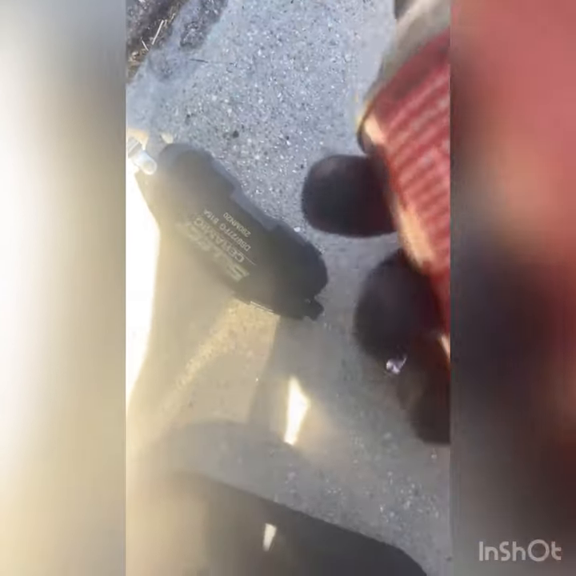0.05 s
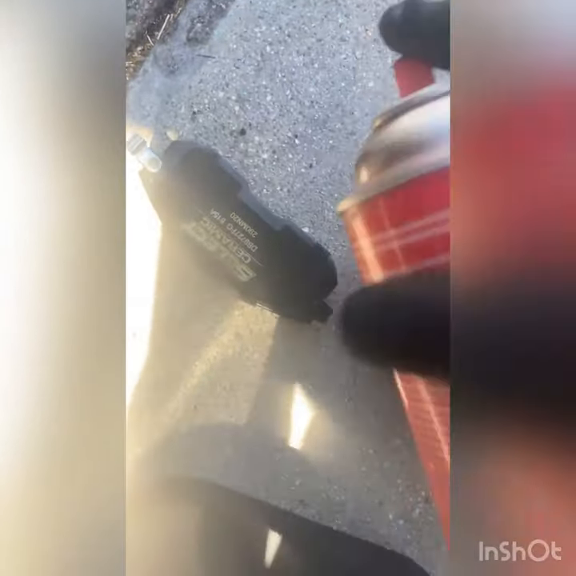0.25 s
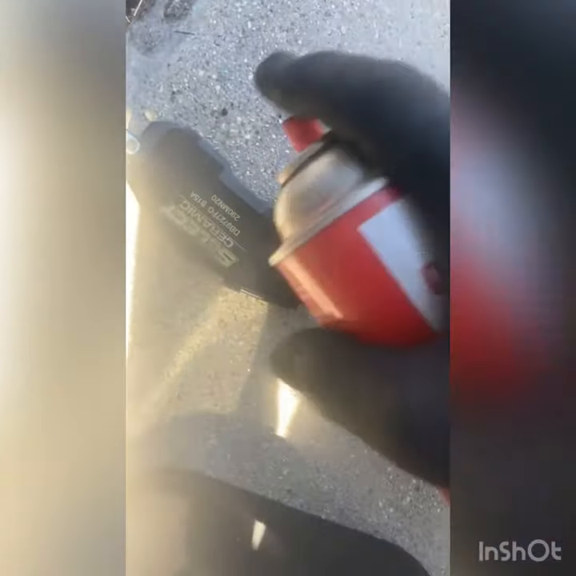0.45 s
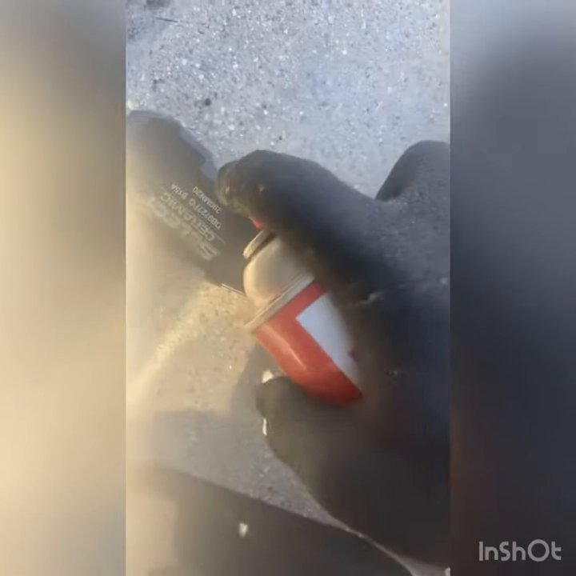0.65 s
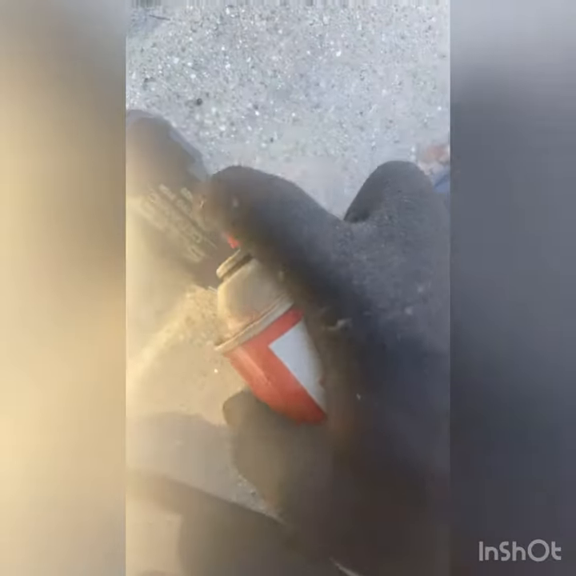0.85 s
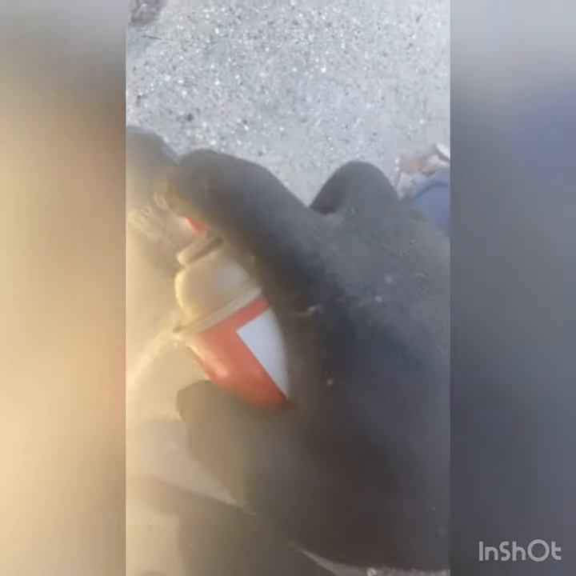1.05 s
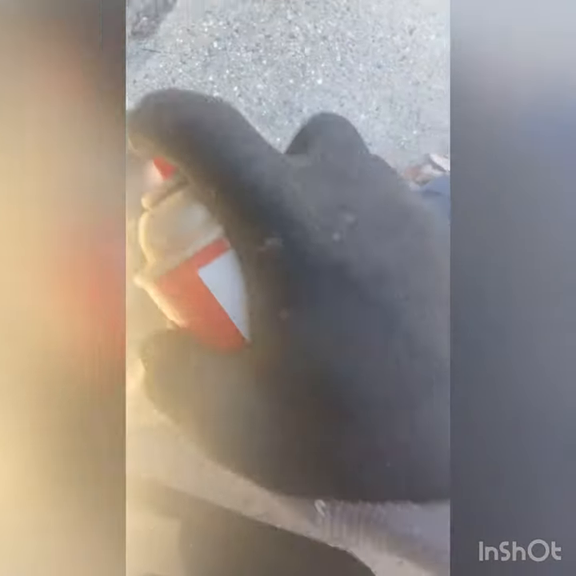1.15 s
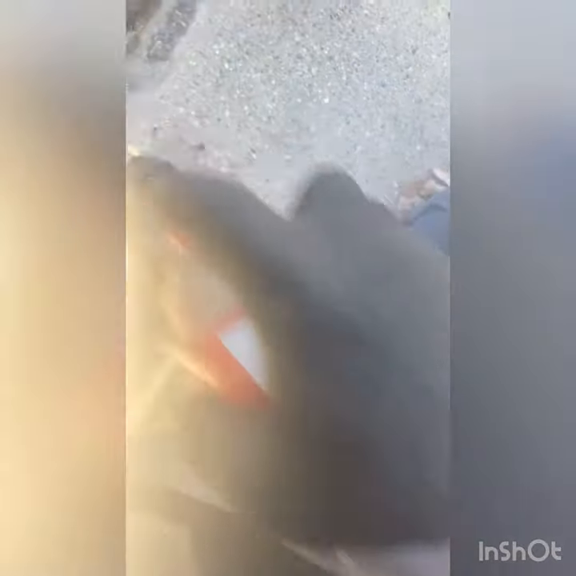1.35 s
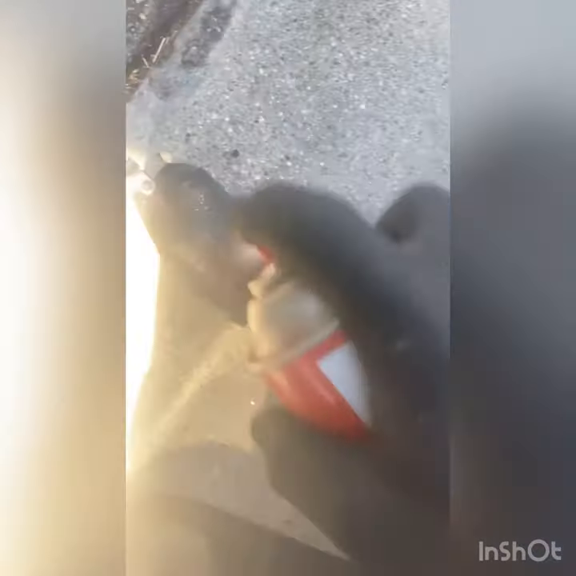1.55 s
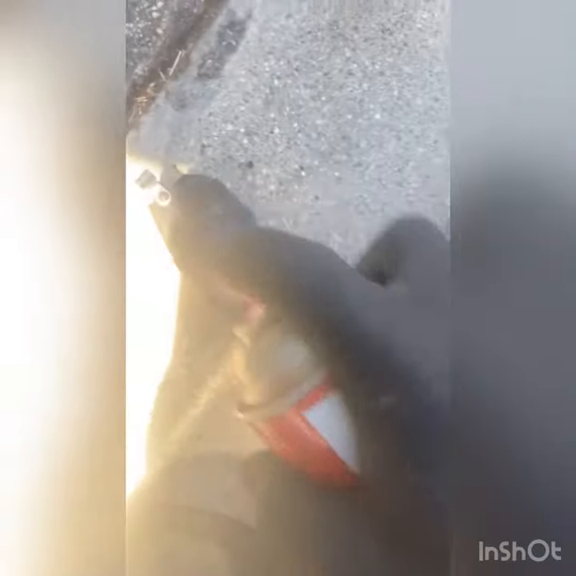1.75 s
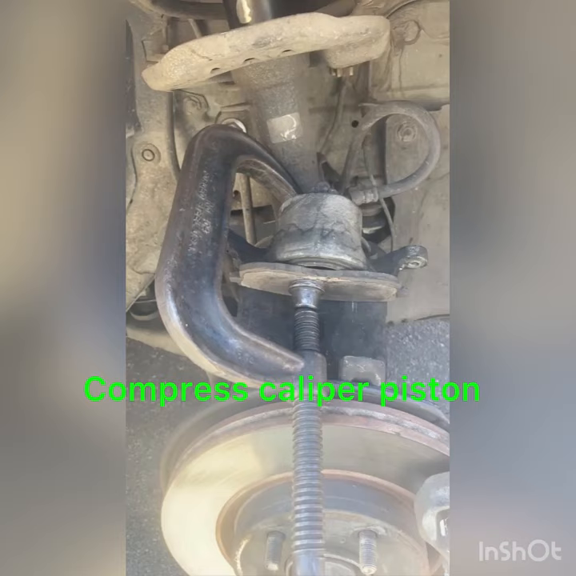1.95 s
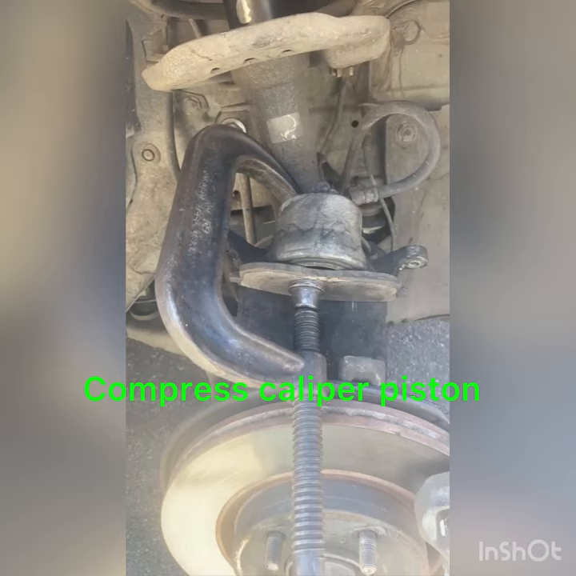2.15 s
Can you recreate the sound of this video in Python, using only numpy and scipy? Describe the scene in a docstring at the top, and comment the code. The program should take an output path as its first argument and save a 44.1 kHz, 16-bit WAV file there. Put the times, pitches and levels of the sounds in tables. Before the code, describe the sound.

A spray can rattles briefly, then sprays with a steady hiss outdoors.

```python
"""A spray can in a gloved hand, close up, outdoors beside a car wheel, over steady air and low rumble. The can
rings faintly and the glove ticks the plastic nozzle; as it is turned, the mixing ball knocks on the steel wall.
Soft handling bumps follow. At 0.8 s the valve opens to a steady hiss whose colour shifts as the can is waved
about. The ball knocks again near 1.5 and 1.9 s; at 1.96 s the sound breaks off abruptly."""
import sys
import numpy as np
from scipy import signal
from scipy.fft import rfft, irfft
from scipy.io import wavfile
from scipy.ndimage import map_coordinates

SR = 44100
rng = np.random.default_rng(int(sys.argv[2]) if len(sys.argv) > 2 else 0)


def transcribe(u):
    """Save the signal u as a 16-bit wav file named by the first command-line argument.

    u: samples, shape (n,) or (channels, n), limited to [-1, 1]; the rate is SR.
    q: integer samples, one column per channel.
    """
    v = np.clip(np.atleast_2d(u).T, -1, 1)
    q = np.round(v * 32767).astype(np.int16)
    wavfile.write(sys.argv[1], SR, q)


N = 97020
T = np.arange(N) / SR

# outdoor background spectra: (frequency [Hz], relative density [dB])
AIR_SPECTRUM = [(90, -11.5), (170, -2.5), (260, -10), (340, -8), (520, -18), (660, -17), (860, -12.5),
                (1200, -20.5), (1500, -19), (2200, -27), (3300, -34.5), (5400, -38.5), (15000, -61)]
RUMBLE_SPECTRUM = [(22, -28), (40, -8), (62, 4.5), (85, 0), (118, 2.5), (150, -4.5), (220, -26), (400, -52)]
# handling bumps: (time [s], level [dB], frequency [Hz])
BUMPS = [(0.614, -27.5, 89), (0.733, -24.5, 65.7), (0.802, -31.5, 61), (0.846, -34, 80.5),
         (0.905, -30.5, 72), (1.000, -26.5, 62), (1.077, -33, 56.7), (1.172, -32.5, 67), (1.845, -33, 110)]
# glove on nozzle: (time [s], level [dB], ping frequency [Hz])
TICKS = [(.0120, -30, 2100), (0.1098, -36, 2300), (0.1123, -44, 6700), (0.129, -46.5, 2400),
         (0.4718, -34, 4070)]
# ball on wall: (time [s], strength [dB], brightness [dB], frequency the struck spot favours [Hz])
KNOCKS = [(0.181, -39, 7, 3000), (0.199, -29, -0.5, 3700), (0.2472, -0.5, -2, 2450),
          (.2712, -6, -0.5, 1760), (0.2858, -19.5, -4, 1600), (.3320, -19.5, -1.5, 2410),
          (0.3446, -32, 3, 2700), (.3550, -36.5, -1.5, 2220), (.4312, -37, 4, 1700),
          (0.4477, -38.5, 1, 4200), (0.575, -37, 0, 1700), (0.613, -40.5, 3, 2250),
          (1.5118, -17, 9.5, 4560), (1.5403, -22, -3, 1800), (1.5557, -25, 5, 1770),
          (1.5640, -29, -7, 2000), (1.8612, -14.5, 5, 4300), (1.894, -25, -7.5, 2110)]
# modes of the liquid-damped can: (frequency [Hz], relative level [dB], T60 [s])
CAN_MODES = [(1294, -16, 0.06), (1619, -6, 0.048), (1690, -14.5, 0.077), (2024, -1, 0.045),
             (2200, -8, 0.049), (2569, -1, .029), (2700, -6.5, .032), (3005, -12.5, 0.042),
             (3127, -22, .03), (3570, -9.5, 0.014), (3773, -8, 0.034), (4170, -22, .03),
             (4360, -16.5, 0.039), (4820, -17, 0.04), (6000, -15, 0.027)]
# spectra of nozzle snap, ball contact, dense wall modes, jet: (frequency [Hz], relative density [dB])
TICK_SPECTRUM = [(500, -4.5), (1800, 6), (4000, 0.5), (6500, -3), (8500, -13), (11000, -5.5), (15500, -17)]
CRACK_SPECTRUM = [(1000, -11), (2600, 9), (4000, 4.5), (5300, -8.5), (7000, -5), (8500, -18.5), (11000, -7),
                  (15500, -23)]
CLANK_SPECTRUM = [(400, -24.5), (1000, -5.5), (2400, -7.5), (3900, 0), (5300, -12), (6700, -8), (8000, -23),
                  (11000, -12.5), (15500, -29)]
JET_SPECTRUM = [(350, -48), (600, -45), (678, -8), (855, -15), (1110, -20.5), (1200, -13.5), (1460, -12),
                (1560, -5.5), (2350, -6.5), (2690, -4), (3390, -6.5), (3680, -5.5), (4770, -1),
                (5320, -2.5), (7480, -5.5), (8220, -12), (9050, -0.5), (10200, -4.5), (12600, 4.5),
                (13300, 4), (15600, -10.5)]
# edges of the four hiss bands: (frequency [Hz])
HISS_EDGES_HZ = [600, 3500, 8200, 10300, 16000]
# band levels as the can moves: (time [s], low [dB], middle [dB], upper [dB], top [dB])
HISS_LEVELS = [(.82, -42, -38, -43.5, -40), (.87, -42, -40, -44, -38), (.93, -41.5, -33.5, -47, -34),
               (1.02, -44, -36.5, -41, -37.5), (1.10, -46, -38, -36, -37.5), (1.16, -47, -38.5, -37, -35),
               (1.23, -47.5, -38.5, -39.5, -40), (1.33, -44.5, -36.5, -41, -36),
               (1.47, -41, -35, -38, -34.5), (1.58, -43.5, -37, -45, -34), (1.66, -44, -36, -45.5, -34.5),
               (1.83, -42, -36, -42, -33), (1.90, -39, -35, -40.5, -37), (1.95, -46, -39, -42, -38.5)]
# narrow notches in the hiss: (width [Hz], rows of (time [s], centre [Hz], gain [dB]))
NOTCHES = [(115, [(1.10, 4870, 0), (1.17, 4900, -13), (1.30, 4990, -13), (1.37, 5100, -12),
           (1.43, 5180, -38), (1.52, 5200, 0)]), (120, [(1.50, 6980, 0), (1.57, 6830, -22),
           (1.65, 6800, 0)]), (90, [(1.66, 4500, 0), (1.73, 4420, -24), (1.80, 4380, 0)]),
           (190, [(.84, 8050, -2), (.98, 8550, -20), (1.10, 8250, 3), (1.24, 8080, -15), (1.37, 8300, -4),
           (1.48, 8080, -28), (1.58, 8200, 0), (1.66, 8400, -32), (1.73, 8100, -28), (1.92, 8080, -27)]),
           (250, [(1.08, 10200, 4), (1.17, 10100, -12), (1.27, 9950, -36), (1.35, 9950, -6),
           (1.44, 10000, 0), (1.50, 10050, -14), (1.60, 9500, -14), (1.72, 10000, 6), (1.88, 10400, -7)])]


def from_db(db):
    """Decibels to gain."""
    return 10 ** (np.asarray(db) / 20)


def unit_rms(x):
    """Scale to unit rms."""
    return x / np.sqrt(np.mean(x ** 2) + 1e-20)


def noise(spectrum, low_hz=15, high_hz=20000):
    """Coloured, band-limited noise, unit rms."""
    hz = np.arange(N // 2 + 1) * SR / N + 1e-3
    points_hz, points_db = np.transpose(spectrum)
    gain = from_db(np.interp(np.log(hz), np.log(points_hz), points_db))
    in_band = (hz > low_hz) & (hz < high_hz)
    return unit_rms(irfft(rfft(rng.standard_normal(N)) * gain * in_band, N))


def drift(rate_hz):
    """Smooth random wander, unit rms."""
    hz = np.arange(N // 2 + 1) * SR / N
    gain = (hz > 0) / (1 + (hz / rate_hz) ** 2)
    return unit_rms(irfft(rfft(rng.standard_normal(N)) * gain, N))


def impulses(times_s, levels_db):
    """One impulse per event."""
    out = np.zeros(N)
    np.add.at(out, (np.abs(times_s) * SR).astype(int), from_db(levels_db))
    return out + 1e-18


def ring(x, hz, t60_s):
    """One mode: each impulse starts a decaying sine."""
    radius, angle = from_db(-60 / (t60_s * SR)), 2 * np.pi * hz / SR
    return signal.lfilter([0, np.sin(angle)], [1, -2 * radius * np.cos(angle), radius ** 2], x)


def decay(x, t60_s):
    """Each impulse starts a decaying envelope."""
    return signal.lfilter([1], [1, -from_db(-60 / (t60_s * SR))], x)


def outdoors(air_db=-45, waver_db=1, rumble_db=-41.5):
    """Slightly wavering air over a low rumble."""
    air = from_db(air_db + waver_db * drift(rate_hz=24)) * noise(AIR_SPECTRUM)
    return air + from_db(rumble_db) * noise(RUMBLE_SPECTRUM)


def handling(rise_s=.02):
    """Each bump swells and dies within a few low cycles."""
    out = np.zeros(N)
    for start_s, db, hz in BUMPS:
        age_s = np.maximum(T - start_s, 0)
        envelope = (age_s / rise_s * np.exp(1 - age_s / rise_s)) ** 2
        out += from_db(db) * envelope * np.sin(2 * np.pi * hz * age_s)
    return out


def nozzle_ticks(ping_gain_db=-2):
    """The glove catches the plastic nozzle: bright snaps, each with its own ping."""
    times_s, levels_db, _ = np.transpose(TICKS)
    pings = sum(ring(impulses(at_s, db + ping_gain_db), hz, t60_s=.042) for at_s, db, hz in TICKS)
    return noise(TICK_SPECTRUM) * decay(impulses(times_s, levels_db), t60_s=.03) + pings


def can_ring(gain_db=-9, spot_db=5, spot_octaves=.22, bright_above_hz=3200, wall_trip_s=.0008):
    """Knocks start each mode within one trip round the wall; the struck spot favours some."""
    times_s, strength_db, bright_db, spot_hz = np.transpose(KNOCKS)
    starts_s = times_s[:, None] + wall_trip_s * rng.random((len(KNOCKS), len(CAN_MODES)))
    out = np.zeros(N)
    for k, (hz, mode_db, t60_s) in enumerate(CAN_MODES):
        favour_db = spot_db * np.exp(-(np.log2(hz / spot_hz) / spot_octaves) ** 2)
        levels_db = gain_db + strength_db + mode_db + favour_db + bright_db * (hz > bright_above_hz)
        out += ring(impulses(starts_s[:, k], levels_db), hz, t60_s)
    return out


def mixing_ball(crack_db=-15.5, clank_db=-23.5, tail_db=-36.5, rim_db=-37, rim_hz=2060, rim_t60_s=.17):
    """Ball on steel: contact crack, brief clank, modal ring. The small can radiates no bass."""
    times_s, strength_db, bright_db, _ = np.transpose(KNOCKS)
    blows = impulses(times_s, strength_db + bright_db)
    crack = noise(CRACK_SPECTRUM) * from_db(crack_db) * decay(blows, t60_s=.0071)
    tail = from_db(tail_db) * decay(blows, t60_s=.091)
    clank = noise(CLANK_SPECTRUM) * (from_db(clank_db) * decay(blows, t60_s=.039) + tail)
    rim = from_db(rim_db - 60 * T / rim_t60_s) * np.sin(2 * np.pi * rim_hz * T)   # ringing from 0 s
    radiation = signal.butter(2, 800, "high", fs=SR, output="sos")
    return signal.sosfilt(radiation, crack + clank + rim + can_ring())


def near_echoes(x, count=7, near_s=.0007, far_s=.0045, gain=.23, sway_s=.00005):
    """Echoes off hand and wheel, their paths swaying, give a hollow, shifting colour."""
    lags_s = np.geomspace(near_s, far_s, count) * rng.uniform(.9, 1.1, count)
    echoes = np.zeros(N)
    for lag_s in lags_s:
        emitted_s = T - lag_s - sway_s * drift(rate_hz=.8)
        echoes += map_coordinates(x, [emitted_s * SR], order=3)
    return (x + gain * echoes) / np.sqrt(1 + count * gain ** 2)


def sliding_notches(x):
    """Narrow notches slide through the hiss, deepening and fading."""
    framing = dict(fs=SR, nperseg=2048, noverlap=1792)
    hz, frame_s, frames = signal.stft(x, **framing)
    for width_hz, path in NOTCHES:
        times_s, centre_hz, gain_db = np.transpose(path)
        offset = (hz[:, None] - np.interp(frame_s, times_s, centre_hz)) / width_hz
        frames *= from_db(np.interp(frame_s, times_s, gain_db) * np.exp(-offset ** 2))
    return signal.istft(frames, **framing)[1][:N]


def valve(band, open_s=.8062, rise_s=.0074, leak_db=-3, leak_db_per_s=336, loss_db_per_band=9.5):
    """Gain of one hiss band: a growing, dull leak, then fully open."""
    leak = from_db(leak_db - loss_db_per_band * band + leak_db_per_s * np.minimum(T - open_s, 0))
    opening = (T - open_s) / rise_s + 1
    return np.clip(np.maximum(leak, opening), 0, 1)


def spray(wall_gain_db=-19.5, sputter_db=.92):
    """The jet rings the can's wall, sputters slightly and mixes with its own echoes."""
    times_s, *bands_db = np.transpose(HISS_LEVELS)
    gains = [valve(band) * from_db(np.interp(T, times_s, db)) for band, db in enumerate(bands_db)]
    bands = zip(HISS_EDGES_HZ, HISS_EDGES_HZ[1:], gains)
    jet = sum(noise(JET_SPECTRUM, low_hz, high_hz) * gain for low_hz, high_hz, gain in bands)
    modes = sum(from_db(db) * ring(rng.standard_normal(N), hz, t60_s) for hz, db, t60_s in CAN_MODES)
    wall = unit_rms(modes) * from_db(wall_gain_db) * gains[0]
    sputter = from_db(sputter_db * drift(rate_hz=18))
    return sliding_notches(near_echoes((jet + wall) * sputter))


def scene():
    """All sources at one point, alike in both channels."""
    mono = mixing_ball() + nozzle_ticks() + spray() + handling() + outdoors()
    return np.array([mono, mono])


def record(dry):
    """Abrupt stop, then a steep low-pass."""
    stop_s, fade_s, cutoff_hz = 1.9585, .001, 15740
    gate = np.clip((stop_s - T) / fade_s, 0, 1)
    low_pass = signal.ellip(12, .1, 80, cutoff_hz, fs=SR, output="sos")
    return signal.sosfilt(low_pass, dry * gate)


dry = scene()
out = record(dry)
transcribe(out)
```